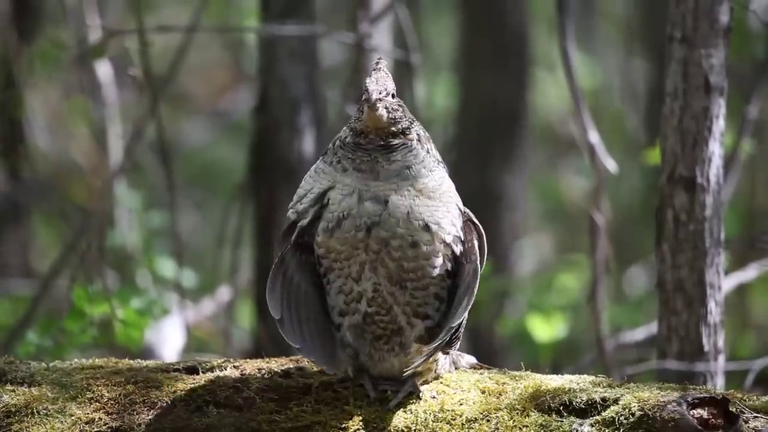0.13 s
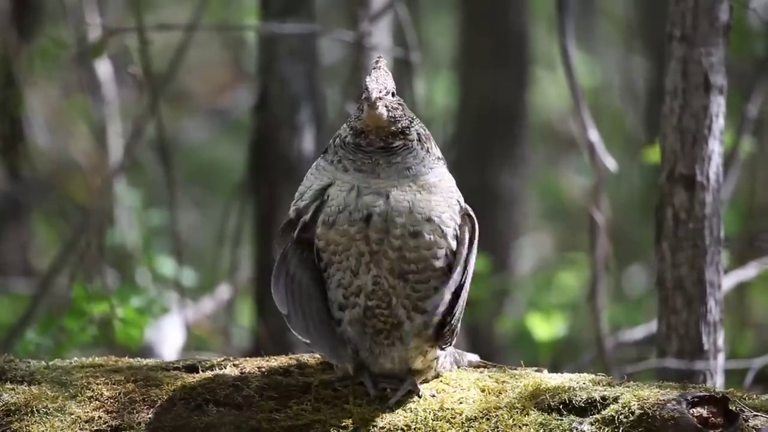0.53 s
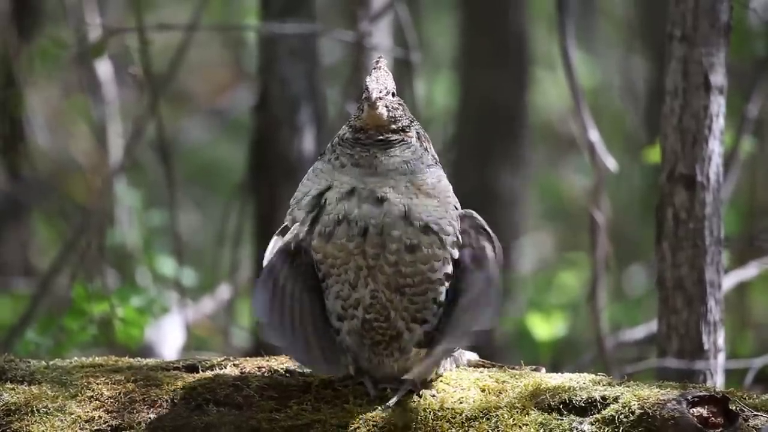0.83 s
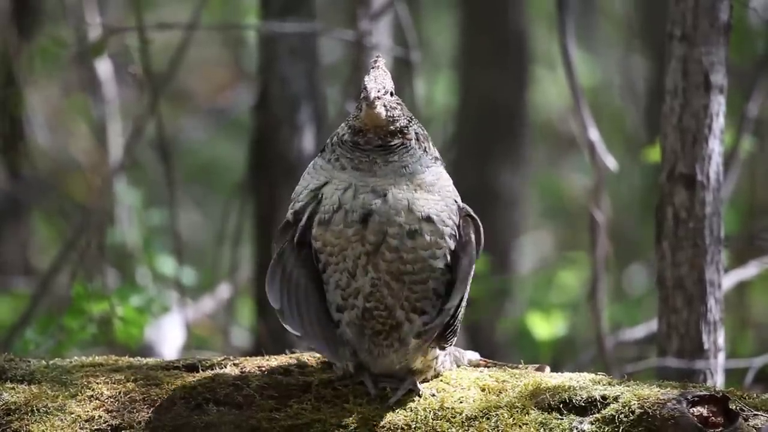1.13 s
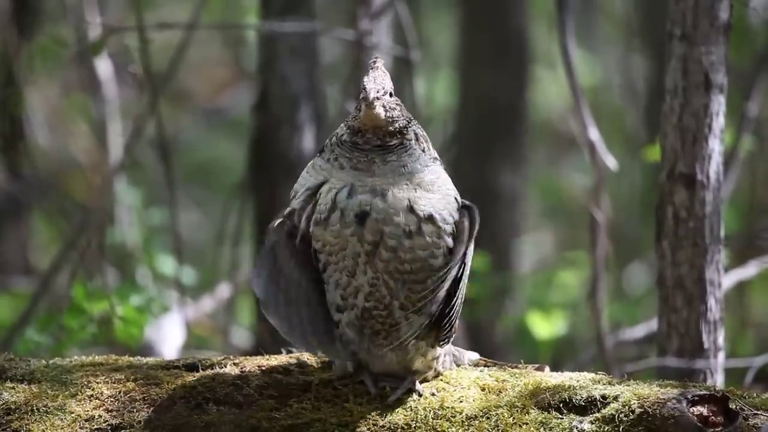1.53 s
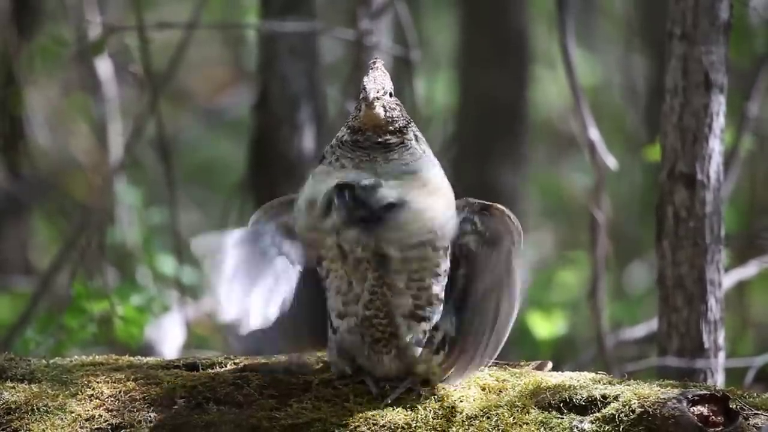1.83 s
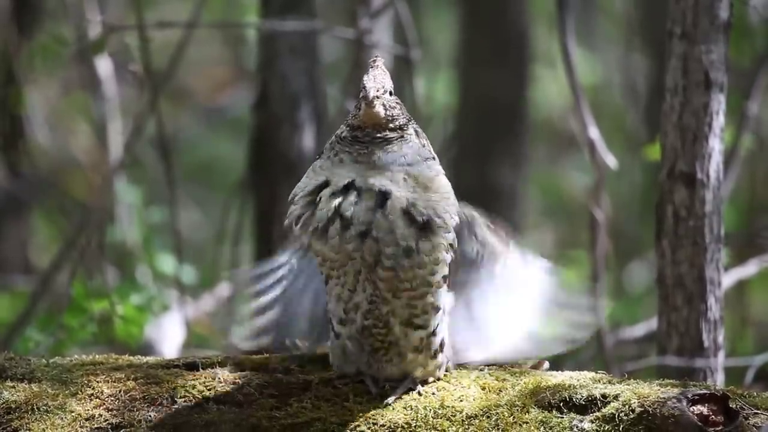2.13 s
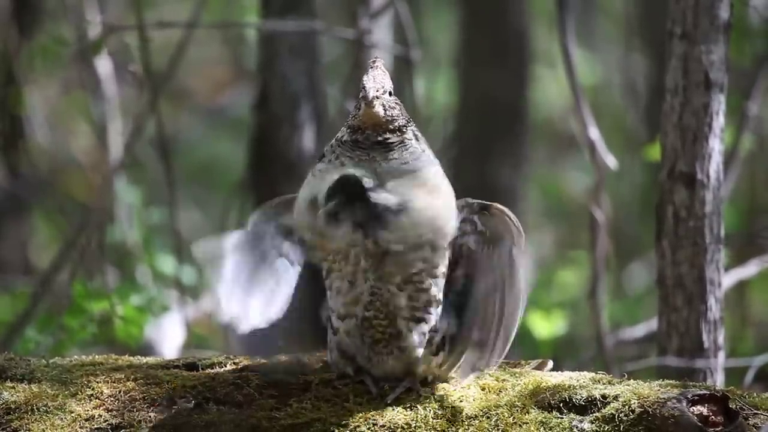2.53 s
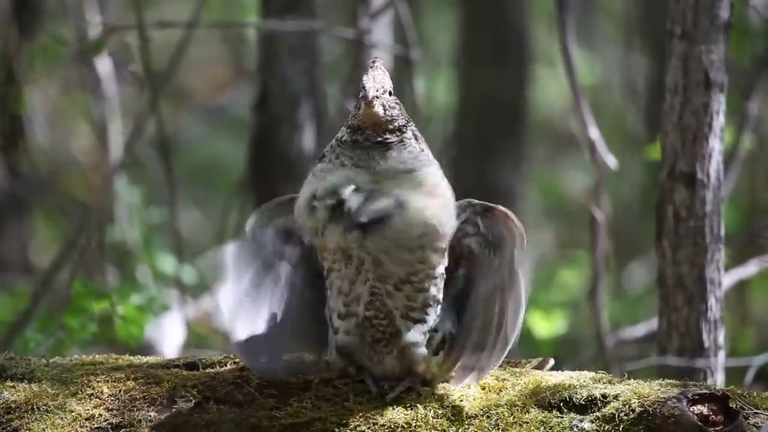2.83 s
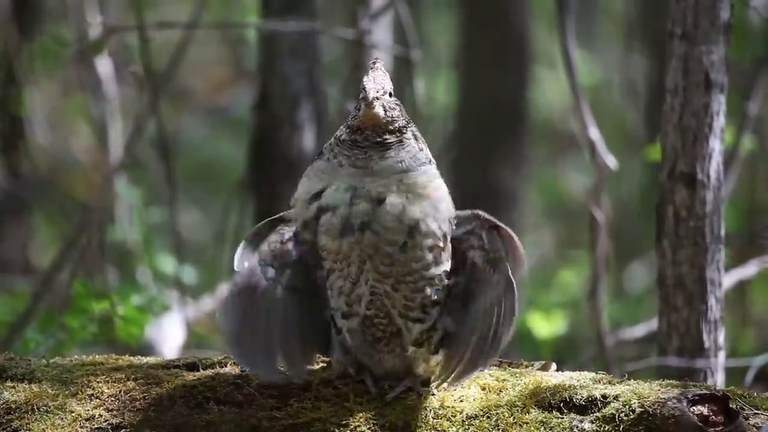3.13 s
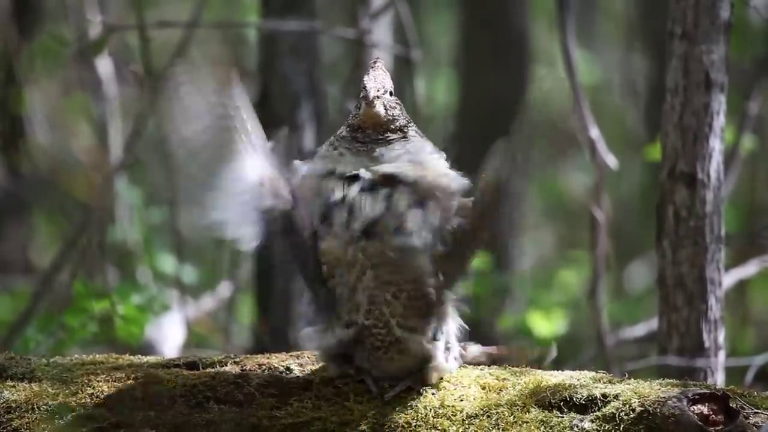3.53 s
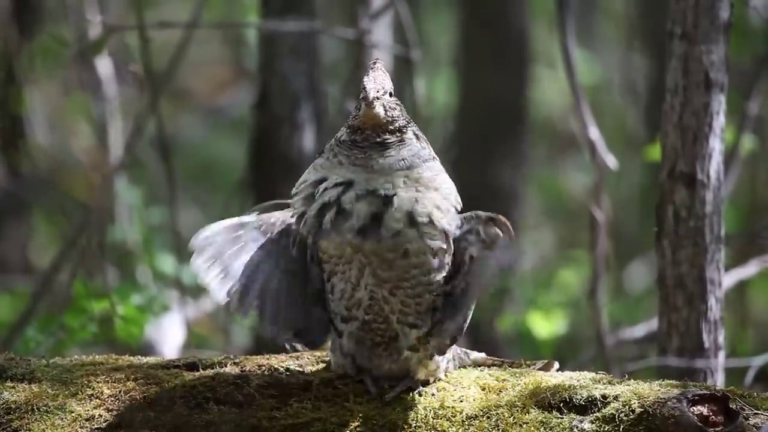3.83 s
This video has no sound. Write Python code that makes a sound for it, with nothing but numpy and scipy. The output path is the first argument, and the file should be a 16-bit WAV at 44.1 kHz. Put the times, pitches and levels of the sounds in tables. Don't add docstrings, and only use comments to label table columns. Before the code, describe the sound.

A grouse on a log drums its wings close to the microphone: deep dull thumps with slight feathery swishes, starting far apart and quickening, over faint frog croaks and clucks and soft leaf hiss in woodland.

```python
import sys
import numpy as np
from scipy import signal
from scipy.fft import rfft, irfft, next_fast_len
from scipy.io import wavfile
from scipy.ndimage import uniform_filter1d, map_coordinates

SR = 44100
rng = np.random.default_rng(int(sys.argv[2]) if len(sys.argv) > 2 else 0)


def wav_out(sig):
    wavfile.write(sys.argv[1], SR, np.round(np.clip(np.atleast_2d(sig).T, -1, 1) * 32767).astype(np.int16))


def linear_from_db(decibels):
    return 10 ** (np.asarray(decibels, float) / 20)


N = 176400

# [start_s, chorus_db, leaf_hiss_db]
FOREST_LEVELS = [(0.0, -53, -62.5), (0.27, -51, -60.5), (1.29, -54.5, -63), (1.79, -51.5, -60),
                 (2.08, -51.5, -58.5), (2.41, -51.5, -60.5), (2.82, -52.5, -60), (3.2, -51, -61),
                 (3.61, -50, -57.5), (4.0, -53, -57.5)]
# [center_hz, width_hz, level_db]
CHORUS_VOICES = [(319.4, 21, -66.5), (448, 94, -60.5), (590, 72, -62.5), (688, 170, -68.5),
                 (1316, 250, -63), (1579, 61, -67), (1790, 160, -66), (2516, 110, -70.5), (2610, 77, -84.5)]
# [freq_hz, density_db_per_hz]
AIR_SPECTRUM = [(26, -65), (45, -28), (82, -15), (161, -17), (328, -4.5), (455, -8), (587, -4.5),
                (845, -13.5), (3500, -17.5), (4550, -60), (7700, -120)]
# [freq_hz, density_db_per_hz]
LEAF_SPECTRUM = [(1470, -5.5), (2500, -37), (3900, 3), (4350, -1), (6890, 3), (9290, -9), (12200, -17),
                 (15700, -49)]
# [center_s, level_db]
BREEZE_PUFFS = [
    (.06, -65),
    (.19, -70),
    (.27, -63),
    (1.15, -73),
    (1.33, -69),
]
# [freq_hz, t60_s]
TRUNK_DECAY = [(60, 1), (200, 0.11), (2000, 0.083), (9000, 0.13)]
# [center_s, length_s, pitch_hz, level_db]
SINGLE_CROAKS = [(0.07, 0.038, 461, -56), (.1, .08, 322, -55.5), (0.234, 0.072, 454, -57),
                 (0.307, 0.11, 598, -54), (.5, 0.1, 466, -55), (0.531, 0.036, 590, -51.5),
                 (0.814, .04, 616, -56), (1.043, .05, 479, -53), (1.26, 0.084, 323, -62),
                 (1.63, 0.027, 452, -54), (1.713, 0.053, 445, -54.5), (1.754, 0.061, 610, -55),
                 (1.828, 0.033, 492, -55), (1.937, 0.036, 590, -51), (2.04, .04, 450.5, -55.5),
                 (2.222, 0.052, 600, -53), (2.269, 0.022, 470, -45.5), (2.28, 0.029, 590, -47),
                 (2.37, 0.041, 586, -51), (2.383, 0.034, 458, -55), (2.66, 0.041, 483, -55),
                 (3.1, 0.062, 325, -52), (3.27, 0.081, 603, -52.5), (3.433, 0.11, 590, -53),
                 (3.494, 0.13, 328.3, -56), (3.513, 0.059, 1284, -55), (3.586, 0.045, 338.5, -49),
                 (3.64, 0.058, 350.4, -53.5), (3.703, 0.031, 496, -53), (3.79, 0.044, 220, -49.5),
                 (3.838, 0.044, 577, -51.5)]
# [start_s, length_s, from_hz, to_hz, level_db]
SONG_NOTES = [(3.696, 0.021, 6750, 5850, -65), (3.71, 0.033, 5830, 5740, -57.5),
              (3.748, 0.025, 6000, 6160, -56), (3.741, 0.014, 5950, 5170, -52),
              (3.832, 0.02, 7030, 6900, -57), (3.848, 0.042, 6850, 6800, -57.5),
              (3.857, .013, 6540, 5800, -51.5), (3.868, .022, 5800, 5550, -53),
              (3.888, 0.019, 6100, 5950, -51), (3.9, 0.014, 5970, 5270, -49.5),
              (3.91, .016, 5350, 3900, -57), (3.912, .026, 6040, 5950, -52), (3.96, .012, 6100, 6100, -57),
              (3.986, .018, 6950, 7000, -53)]
# [time_s, wing_rate_hz, rasp_db, hum_db]
FLY_PATH = [(1.7, 216, -74, -90), (1.9, 217, -70, -72), (2.05, 216, -55, -83), (2.08, 216, -61, -79),
            (2.121, 215, -58, -73), (2.3, 212, -58, -80), (2.5, 195, -74, -92), (2.68, 176, -57, -71),
            (2.72, 174, -54, -71), (2.8, 200, -58, -69), (2.902, 190, -83, -75.5), (3.52, 175, -68, -74),
            (3.62, 195, -70, -52.5), (3.7, 165, -75, -68), (3.76, 160, -80, -85)]
# [center_hz, width_hz, level_db]
RASP_BANDS = [(4400, 2500, 9), (6800, 1400, 5), (8500, 2700, -14)]
# [multiple, level_db]
HUM_PARTIALS = [(1, 4), (2, -5.5), (3, -10)]
# [center_s, length_s, center_hz, level_db]
FLY_TURNS = [(1.93, .03, 7000, -57), (1.95, 0.045, 8250, -60), (1.967, .015, 6600, -55),
             (1.995, .035, 4400, -62), (1.998, .03, 7900, -60), (2.01, .02, 6900, -56),
             (2.025, .012, 5500, -56), (2.045, .035, 7100, -57.5), (2.057, 0.1, 1160, -59),
             (2.12, 0.036, 6800, -55), (2.15, 0.037, 4600, -60.5), (2.155, .03, 9700, -69),
             (2.19, 0.034, 7500, -58), (2.695, 0.018, 6700, -63), (2.71, .025, 6400, -57),
             (2.74, .03, 6800, -61), (2.765, .025, 7500, -64), (2.793, .03, 6900, -64)]
# [start_s, peak_db]
LEAF_TICKS = [
    (.702, -44),
    (.719, -37),
    (.74, -37),
    (.7726, -40),
    (2.1021, -36),
    (3.324, -21),
    (3.349, -29),
    (3.535, -27.5),
    (3.5697, -27),
    (3.9975, -34),
]
# [start_s, peak_db, pitch_hz]
FROG_CLUCKS = [(0.17, -34.5, 1900), (0.2364, -36, 1910), (0.3209, -39, 1790), (0.9003, -35.5, 1790),
               (1.049, -33.5, 1910), (1.062, -36, 1840), (1.1223, -35.5, 1890), (1.3372, -37.5, 1860),
               (1.55, -38, 1810), (2.1806, -36, 1940), (2.217, -36, 1870), (2.2722, -32.5, 1760),
               (2.353, -34, 1920), (2.379, -36, 1890), (2.644, -35, 1900), (2.8318, -37, 1840),
               (2.9344, -36.5, 1850), (3.007, -38, 1930), (3.272, -36, 1800), (3.2967, -42, 1860),
               (3.4248, -35.5, 1850), (3.4535, -34, 1820), (3.5203, -37.5, 1890), (3.6657, -34.5, 1790),
               (3.7223, -38.5, 1870), (3.852, -38, 1860), (3.875, -39, 1780)]
# [pitch_multiple, level_db, t60_s]
THROAT_MODES = [(1.001, -6, 0.026), (1.33, -5, 0.0052), (1.7, -4.5, 0.0041), (2.08, 1.5, 0.0073)]
# [trough_s, level_db, swing_hz]
WING_BEATS = [(.4061, -19.8, 89), (.9679, -18.6, 89.5), (1.4487, -17.2, 90), (1.8681, -17.3, 89.5),
              (2.2378, -17.4, 89.5), (2.5686, -17.2, 88), (2.866, -17.6, 87), (3.1332, -18, 86.5),
              (3.3751, -18.3, 85), (3.5964, -18.4, 84.5), (3.7982, -18.5, 83.5), (3.9841, -18.8, 83)]
# [swish_db, slap_db, slap_hz]
FEATHER_STROKES = [(-41, -39.5, 767), (-39.5, -39.5, 797), (-37, -38.5, 805), (-37, -48, 760),
                   (-38.5, -43, 827), (-37, -39.5, 753), (-36.5, -41.5, 760), (-38.5, -63, 900),
                   (-37.5, -45, 630), (-36.5, -43, 644), (-37.5, -43.5, 1030), (-37.5, -60, 733)]
SNAP_LEADS = [.0116, .0117, .0085, .0119, .0115, .012, .0081, .0084, .0065, .0102, .0074, .0085]
# [freq_hz, density_db_per_hz]
FEATHER_SPECTRUM = [(250, -4.5), (700, -4), (1500, -11), (3000, -12.5), (4000, -8), (6500, -3), (8500, -10),
                    (11000, -30), (15700, -37)]


def unit(x):
    return x / np.sqrt(np.mean(x ** 2) + 1e-20)


def along(points, hz):
    point_hz, value = np.transpose(points)
    return np.interp(np.log(hz + 1), np.log(point_hz + 1), value)


def curve(times_s, values):
    return np.interp(np.arange(N) / SR, times_s, values)


def bell(t_s, width_s):
    return np.exp(-.5 * (t_s / width_s) ** 2)


def swell(center_s, length_s):
    first = max(round((center_s - 2 * length_s) * SR), 0)
    last = min(round((center_s + 2 * length_s) * SR), N)
    i = np.arange(first, last)
    return i, bell(i / SR - center_s, 0.31 * length_s)


def wobble(rate_hz):
    return map_coordinates(rng.standard_normal(400), [np.arange(N) * min(rate_hz, 90) / SR])


def filtered(x, response):
    m = next_fast_len(N + SR // 2)
    return irfft(rfft(x, m) * response(np.fft.rfftfreq(m, 1 / SR)), m)[..., :N]


def peak(center_hz, width_hz):
    return lambda f: 1j * f * width_hz / (center_hz ** 2 - f * f + 1j * f * width_hz)


def double_peak(center_hz, width_hz):
    return lambda f: peak(center_hz, width_hz)(f) ** 2


def rush(spectrum, patchy_db):
    z = signal.stft(rng.standard_normal(N), nperseg=512)[2]
    field = uniform_filter1d(rng.standard_normal(z.shape), 8, 0)
    field = uniform_filter1d(field, 8, 1)
    patchy = signal.istft(z * linear_from_db(patchy_db * unit(field)), nperseg=512)[1][:N]
    return unit(filtered(patchy, lambda hz: linear_from_db(along(spectrum, hz))))


def forest():
    croaks_per_s, croak_db = 24, 1.6
    time_s, chorus_db, leaves_db = np.transpose(FOREST_LEVELS)
    chorus_db, leaves_db = curve(time_s, chorus_db), curve(time_s, leaves_db)
    shared = wobble(croaks_per_s)
    voices = 0
    for hz, width_hz, db in CHORUS_VOICES:
        croak_level = unit(linear_from_db(croak_db * (0.38 * shared + 0.77 * wobble(croaks_per_s / 2))))
        croak = croak_level * rng.standard_normal(N)
        voices = voices + linear_from_db(db) * unit(filtered(croak, double_peak(hz, width_hz)))
    air = linear_from_db(-54) * rush(AIR_SPECTRUM, patchy_db=2.0)
    far = linear_from_db(chorus_db - chorus_db.mean()) * (voices + air)
    leaves = linear_from_db(leaves_db + 1 + 0.31 * wobble(28.9)) * rush(LEAF_SPECTRUM, patchy_db=-1.5)
    mic_hiss = linear_from_db(-60.5) * filtered(rng.standard_normal(N), peak(4900, 8800))
    return far + leaves + mic_hiss


def breeze():
    t = np.arange(N) / SR
    level = sum(linear_from_db(db) * bell(t - s, 0.012) for s, db in BREEZE_PUFFS)
    return level * unit(filtered(rng.standard_normal(N), double_peak(45, 60)))


def trunks(x):
    gap_s = 0.022
    hz, t, z = signal.stft(rng.standard_normal(SR // 2), SR, nperseg=256)
    decay = linear_from_db(-60 * t / along(TRUNK_DECAY, hz)[:, None])
    tail = signal.istft(z * decay, SR, nperseg=256)[1]
    delayed = np.pad(x, (round(gap_s * SR), 0))
    return signal.fftconvolve(delayed, tail / np.linalg.norm(tail))[:N]


def croaks():
    waver_hz, rough_db = 25.5, 1.5
    level, bend = unit(filtered(rng.standard_normal((2, N)), peak(0.87, 123)))
    out, drift = np.zeros(N), np.cumsum(waver_hz * bend) / SR
    for s, length_s, hz, db in SINGLE_CROAKS:
        i, bump = swell(s, length_s)
        out[i] += linear_from_db(db + 3.0) * bump * np.sin(2 * np.pi * (hz * i / SR + drift[i]))
    return linear_from_db(rough_db * level) * out


def songbird():
    flutter_hz, bend_hz, flutter_db = 130, 50, 3.2
    out = np.zeros(N + SR)
    shake = unit(filtered(rng.standard_normal((2, N)), peak(1, flutter_hz)))
    for s, length_s, from_hz, to_hz, db in SONG_NOTES:
        u = np.arange(round(length_s * SR)) / (length_s * SR)
        start = round(s * SR)
        level, bend = shake[:, min(start, N - len(u)):][:, :len(u)]
        hz = from_hz + (to_hz - from_hz) * u + bend_hz * bend
        envelope = np.sin(np.pi * u ** 0.4) ** 0.46
        whistle = np.sin(2 * np.pi * np.cumsum(hz) / SR)
        out[start:][:len(u)] += linear_from_db(db + 5.5 + flutter_db * level) * envelope * whistle
    return out[:N]


def fly():
    turn_width = 0.22
    time_s, *columns = np.transpose(FLY_PATH)
    rate_hz, rasp_db, hum_db = (curve(time_s, c) for c in columns)
    cycles = np.cumsum(rate_hz) / SR
    clicks = np.diff(np.floor(cycles), prepend=0) * linear_from_db(2.0 * rng.standard_normal(N))
    rasp, hum, facing = np.zeros((3, N))
    for hz, width_hz, db in RASP_BANDS:
        rasp += linear_from_db(db + 3.0 * wobble(35.4)) * unit(filtered(clicks, double_peak(hz, width_hz)))
    for k, db in HUM_PARTIALS:
        hum += linear_from_db(db + 6.0 * wobble(25.1)) * np.sin(2 * np.pi * k * cycles)
    for s, length_s, hz, db in FLY_TURNS:
        i, bump = swell(s, length_s)
        band = signal.iirpeak(hz, 1 / turn_width, SR)
        ring = signal.lfilter(*band, signal.lfilter(*band, clicks[i]))
        facing[i] += linear_from_db(db) * bump * unit(ring)
    return linear_from_db(rasp_db - 7.5) * unit(rasp) + facing + linear_from_db(hum_db) * hum


def leaf_ticks():
    out, t = np.zeros(N + SR), np.arange(SR // 20) / SR
    for s, db in LEAF_TICKS:
        out[round(s * SR):][:len(t)] += linear_from_db(db - 3.0 - 60 * t / 0.0029) * rng.standard_normal(len(t))
    return filtered(out[:N], lambda f: peak(7500, 4500)(f) ** 4)


def clucks():
    pulse_gap_s, dulling_db, gain_db = 0.001625, 3.5, -6.5
    out, t = np.zeros(N + SR), np.arange(SR // 20) / SR
    for s, db, hz in FROG_CLUCKS:
        for k in range(3):
            ring = 0
            for multiple, mode_db, t60_s in THROAT_MODES:
                luck = rng.standard_normal()
                level_db = mode_db + 1.9 * luck - dulling_db * k * (multiple - 1)
                mode_hz = hz * multiple * (1 + 0.053 * (multiple - .7) * luck)
                ring = ring + linear_from_db(level_db - 60 * t / t60_s) * np.sin(2 * np.pi * mode_hz * t)
            out[round((s + k * pulse_gap_s) * SR):][:len(t)] += linear_from_db(db + gain_db) * ring
    return filtered(out[:N], double_peak(2700, 3000))


def wing_thumps():
    swing_cycles, skew, sag_per_s, crest_lead_s = .45, .19, 8, .001
    draw_lead_s, draw_width_s, draw_db = .0142, .0017, -22
    t, out = np.arange(N) / SR, np.zeros(N)
    for s, db, hz in WING_BEATS:
        u = t - s
        crest = u + crest_lead_s
        width_s = swing_cycles / hz * (1 + skew * np.tanh(crest * hz / swing_cycles))
        swing = bell(crest, width_s) * np.cos(2 * np.pi * hz * (u - sag_per_s * u * u))
        draw = linear_from_db(draw_db) * bell(u + draw_lead_s, draw_width_s)
        out -= linear_from_db(db) * (swing + draw)
    return out


def wing_feathers():
    swish_lead_s, rise_s, prelude_db = .004, 0.01, -4.5
    swish_t60_s, tail_db, tail_t60_s = 0.036, -1.5, 0.25
    snap_db, snap_t60_s = -11, 0.011
    rebound_s, rebound_width_s, rebound_db = 0.014, 0.002, -11.5
    slap_lead_s, slap_width_s = .002, .0028
    split_hz, body_width_s, body_db, body_tail_db = 3520, 0.0062, -5, -2.5
    t = np.arange(N) / SR
    swish, body, slap = np.zeros((3, N))
    for (s, _, _), (swish_db, slap_db, slap_hz), snap_lead_s in zip(WING_BEATS, FEATHER_STROKES, SNAP_LEADS):
        u = t - s
        v, opened, struck = u + swish_lead_s, u + snap_lead_s, u + slap_lead_s
        after = np.maximum(v, 0)
        fall = linear_from_db(-60 * after / swish_t60_s) + linear_from_db(tail_db - 60 * after / tail_t60_s)
        fall = fall / (1 + linear_from_db(tail_db))
        rise = np.exp(np.minimum(v, 0) / rise_s) * np.where(opened < 0, linear_from_db(prelude_db), 1)
        snap = (opened > 0) * linear_from_db(snap_db - 60 * np.abs(opened) / snap_t60_s)
        rebound = linear_from_db(rebound_db) * bell(u - rebound_s, rebound_width_s)
        swish += linear_from_db(swish_db) * (rise * fall + snap + rebound)
        gust = linear_from_db(body_db) * bell(struck, body_width_s)
        body += linear_from_db(swish_db) * (gust + linear_from_db(body_tail_db) * rise * fall)
        tone = np.cos(2 * np.pi * slap_hz * u + rng.uniform(0, 2 * np.pi))
        slap += linear_from_db(slap_db + 2.0) * bell(struck, slap_width_s) * tone
    flutter_db = 2.54 * unit(filtered(rng.standard_normal(N), peak(1, 230)))
    air = linear_from_db(flutter_db) * rush(FEATHER_SPECTRUM, patchy_db=1.5)
    low = filtered(air, lambda f: 1 / (1 + (f / split_hz) ** 8))
    return swish * (air - low) + body * low + slap


def scene():
    thump, feathers = wing_thumps(), wing_feathers()
    far = clucks() + leaf_ticks() + songbird()
    thump_echo = linear_from_db(-29) * filtered(thump, peak(119, 90))
    echo = trunks(thump_echo + linear_from_db(-18.0) * feathers + linear_from_db(-14.5) * far)
    background = forest() + breeze() + croaks() + fly()
    return (thump + feathers + far + echo + background)[None]


def band_limit(x):
    return signal.sosfilt(signal.butter(12, 15810, fs=SR, output="sos"), x)


def record(dry):
    top_hz = 15780
    mix = filtered(dry, lambda hz: hz < top_hz)
    return band_limit(mix)


dry = scene()
out = record(dry)
wav_out(out)
```